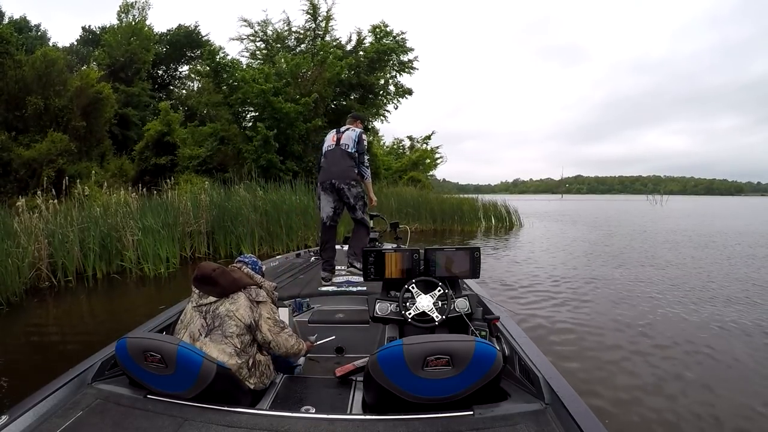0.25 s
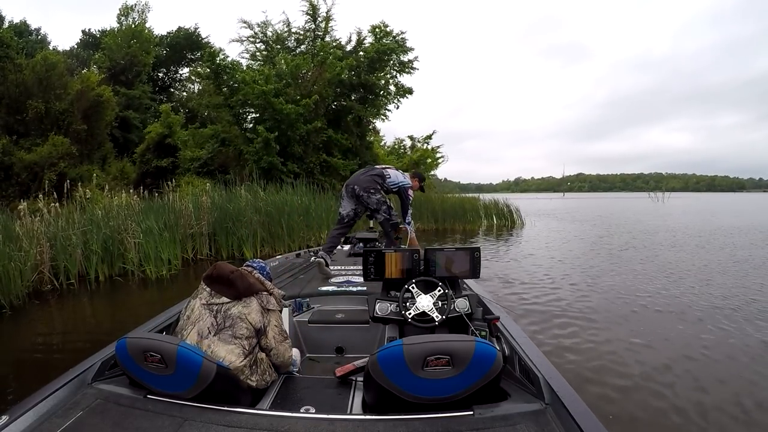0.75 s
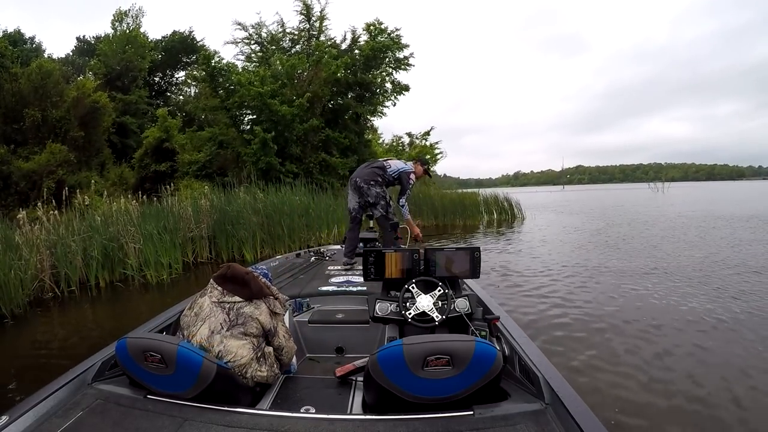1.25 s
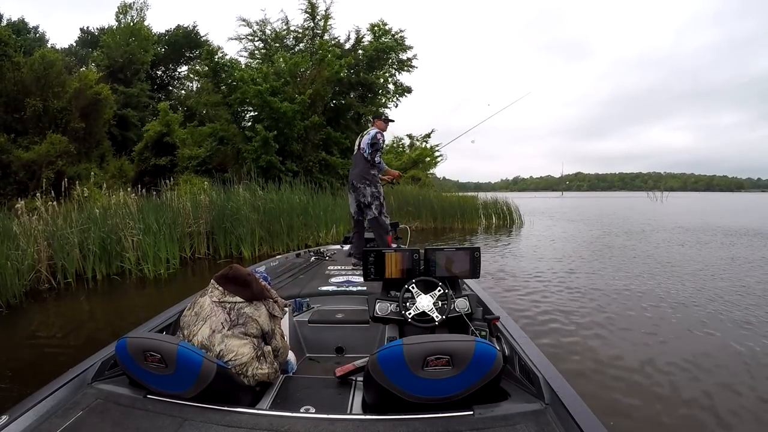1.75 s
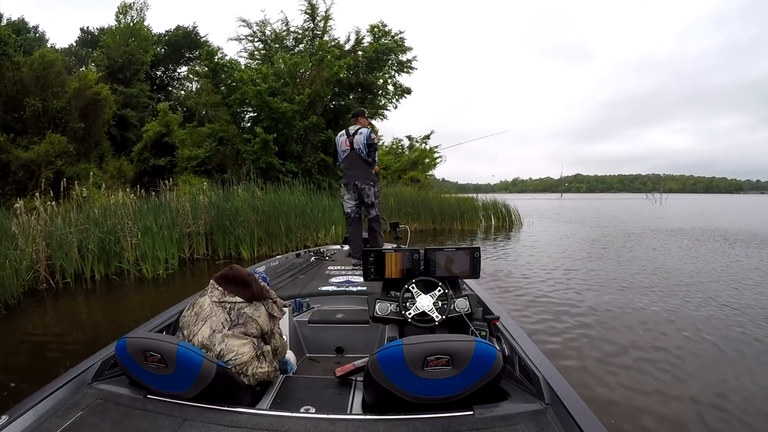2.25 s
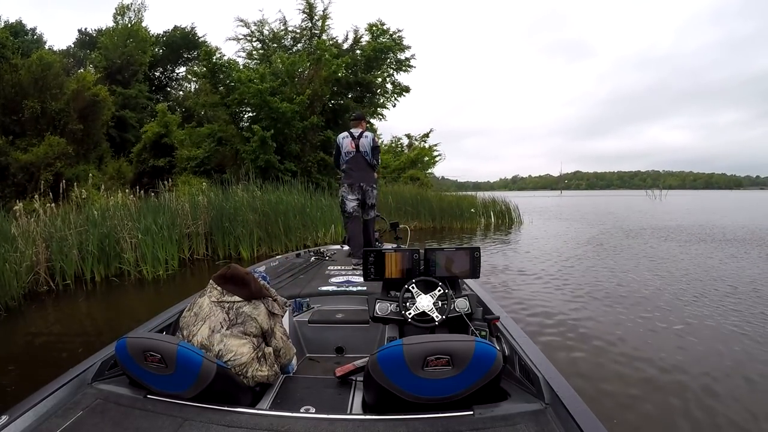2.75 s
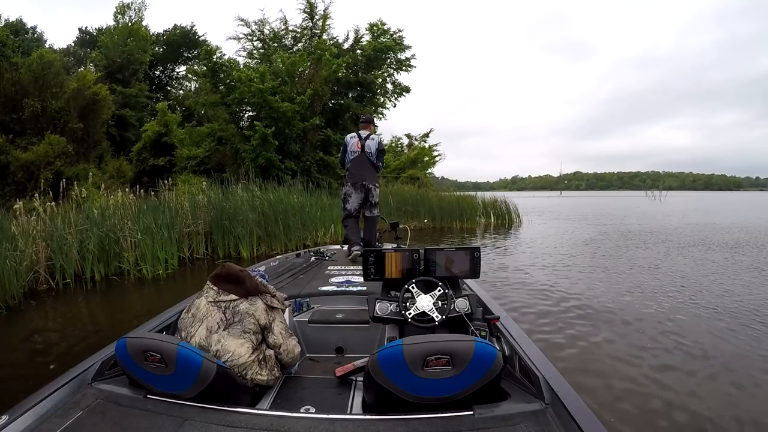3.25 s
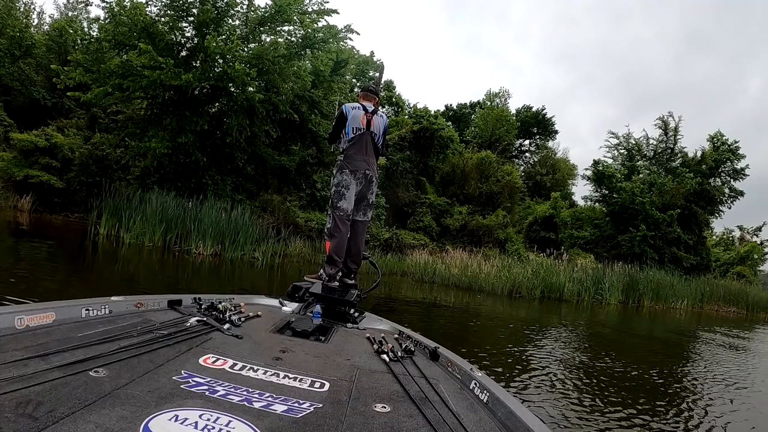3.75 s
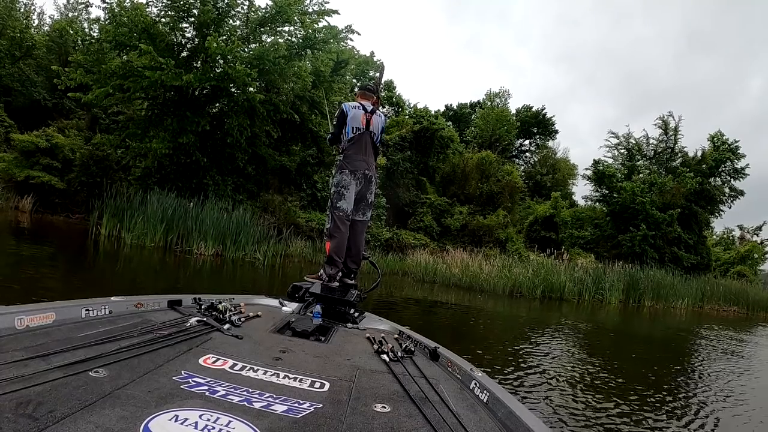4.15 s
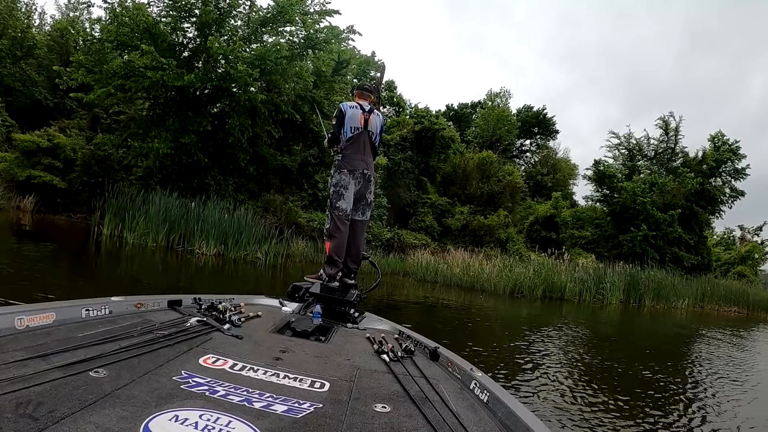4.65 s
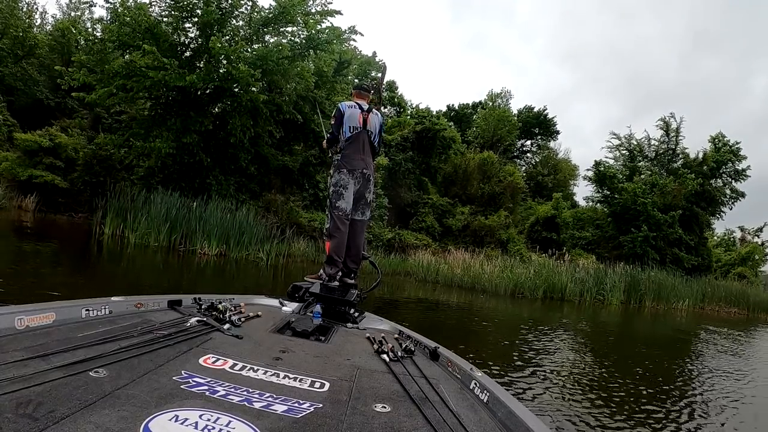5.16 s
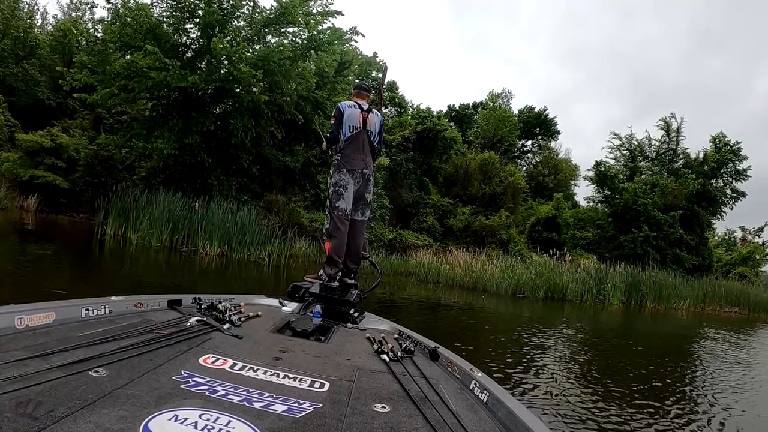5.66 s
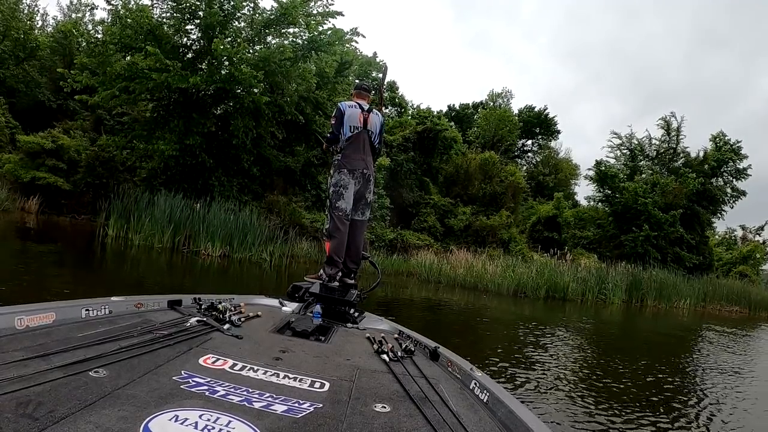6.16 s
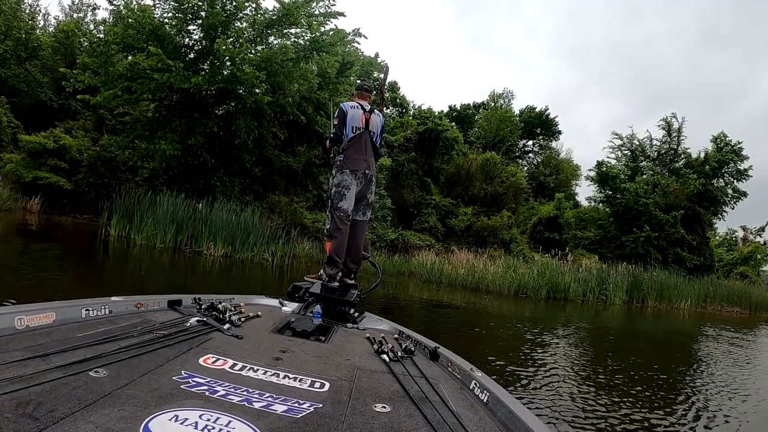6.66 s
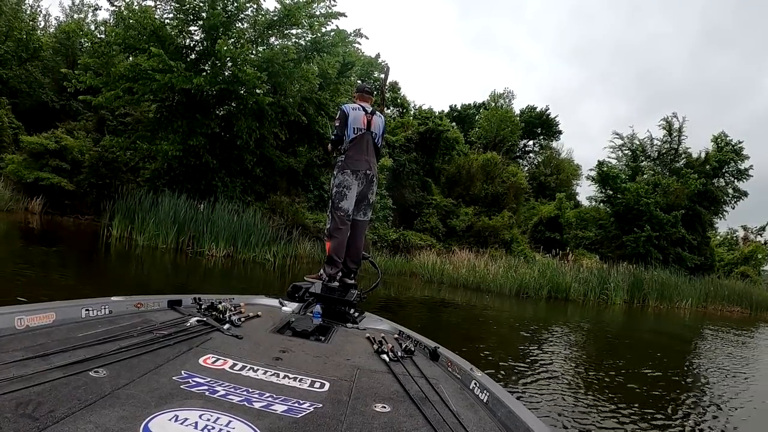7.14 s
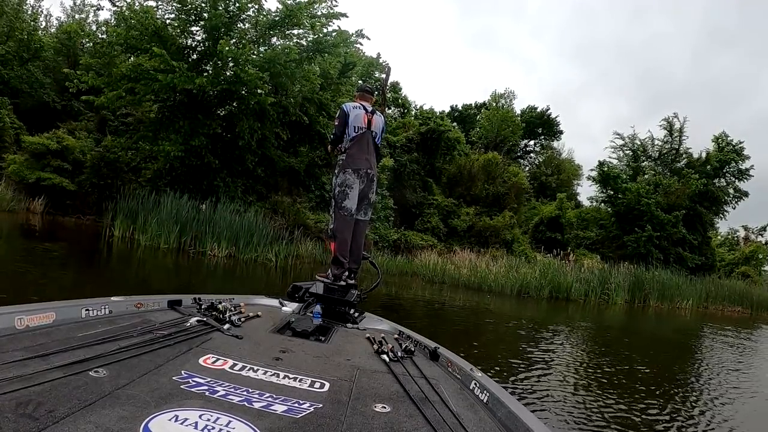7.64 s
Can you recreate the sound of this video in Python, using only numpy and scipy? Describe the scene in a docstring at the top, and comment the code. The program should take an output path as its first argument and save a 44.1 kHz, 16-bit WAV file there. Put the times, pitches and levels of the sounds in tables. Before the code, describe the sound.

Footsteps and gear knock on a boat deck amid wind rumble and lapping water, then a songbird whistles four times and a fishing reel clicks.

```python
"""Angler on a fishing boat

Stern, mono: steps and gear knock on a carpeted deck, the hull booms, tackle clinks, a rain suit
rustles, ripples lap, wind rumbles on the microphone. At 3.7 s the listening point jumps to the
quieter bow, stereo: a songbird whistles four times, the reel clicks, shore trees echo both."""
import sys
import numpy as np
from scipy import signal
from scipy.fft import rfft, irfft, next_fast_len
from scipy.io import wavfile
from scipy.ndimage import uniform_filter1d

SR = 44100
rng = np.random.default_rng(int(sys.argv[2]) if len(sys.argv) > 2 else 0)


def file_out(sig):
    """Save sig as 16-bit WAV at sys.argv[1]."""
    # one column per channel
    cols = np.atleast_2d(sig).T
    # limit, then scale
    lim = np.clip(cols, -1, 1)
    pcm = np.round(lim * 32767).astype(np.int16)
    wavfile.write(sys.argv[1], SR, pcm)


N = 348345
T = np.arange(N) / SR
JUMP_S = 3.708  # stern to bow
LEAD_S = .05  # carpet brush ahead of a blow

# heel strikes: t/s, contact/s, level/dB, panel note/Hz, ring/dB, tick/dB
HEEL_STRIKES = [(.142, 0.019, -47, 430, -7, -23), (.256, 0.021, -47.5, 490, -2, -2),
                (.49, 0.025, -48, 509, -2.5, -24), (1.078, 0.0039, -36, 493, -3, -14),
                (1.183, 0.0098, -32, 243, 1.5, -17.5), (1.261, 0.0088, -42, 516, -15, -19),
                (1.287, 0.016, -41.5, 321, 4, -13), (1.472, 0.02, -42, 283, 5.5, -7.5),
                (1.517, 0.023, -38, 264.4, 8, -11), (1.543, 0.0054, -44.5, 452, 10, -1),
                (1.648, 0.013, -27.5, 390, -0.5, -8.5), (1.841, 0.012, -36.5, 529, -0.5, -12),
                (1.864, 0.01, -39.5, 544, -4, -7), (1.927, 0.025, -43.5, 444, 1, -15),
                (2.06, 0.0088, -41.5, 326, -5, -10), (2.269, 0.015, -39, 710, -0.5, -12.5),
                (2.384, 0.031, -58.5, 306, 12, -19), (2.622, 0.017, -34.5, 316, 1.5, -16),
                (2.928, 0.0074, -28.5, 658, 4.5, -10.5), (3.033, 0.029, -44, 388, -4, -8),
                (3.105, 0.0058, -42, 1080, -19, -14), (3.138, 0.005, -51.5, 563, 2, -20),
                (3.168, 0.0059, -49, 323, 2, -28), (3.217, 0.0078, -44, 318, 4.5, -31),
                (3.273, 0.012, -37, 554, -7, -14), (3.324, 0.012, -42, 422, 0.5, -18),
                (3.679, 0.012, -42, 900, -4, -22)]
# rod and gear on deck: t/s, contact/s, level/dB, hardness/dB, part note/Hz, ring/dB
GEAR_KNOCKS = [(.401, 0.0049, -51, 6, 3900, -2), (.543, 0.01, -41.5, -2.5, 2040, -2.5),
               (.608, 0.0087, -43, 2.5, 1680, -8), (.916, 0.0064, -32.5, 3, 2170, -6.5),
               (1.036, 0.01, -58, 14.5, 5470, 1), (1.227, 0.0078, -42, 1, 3080, -12),
               (1.563, 0.014, -32, -2, 1415, -12), (1.622, 0.013, -34.5, 2, 1600, -3),
               (1.688, 0.011, -40, 3.5, 2280, -3), (1.739, 0.0062, -40.5, -2.5, 1320, -9),
               (1.782, 0.0087, -25.5, -1.5, 1035, -13), (1.796, 0.017, -28.5, -2, 1530, -10),
               (1.814, 0.0085, -30, -1, 1290, -10), (1.897, 0.0066, -32.5, -3, 1400, -9),
               (2.494, 0.021, -30, -2, 864, -2.5), (2.566, 0.017, -43.5, 4.5, 2620, -19),
               (2.602, 0.014, -35.5, 6.5, 1463, -2), (2.842, 0.013, -35, -6, 1397, -3.5),
               (2.899, 0.022, -37.5, -5, 1480, -9), (3.065, 0.01, -39.5, 1.5, 1530, -9),
               (3.191, 0.0037, -64, 13.5, 6300, 4), (3.42, 0.01, -44.5, 0, 2636, -6),
               (3.551, 0.013, -34, -2.5, 395, -3.5), (3.656, 0.014, -37, 0, 1490, -16),
               (3.702, 0.0029, -39.5, -1.5, 973, 2.5)]
# deck and hatch resonances: f/Hz, width/Hz, level/dB
DECK_MODES = [(249, 98, 6.5), (332, 100, -2), (389, 30, 1), (510, 104, 2), (658, 47, 5), (851, 92, -0.5),
              (1037, 117, 4.5), (1280, 140, 1.5), (1478, 88, 1), (1950, 93, -10), (3340, 90, -6.5),
              (3870, 45, -12)]
# dense small deck modes: f/Hz, level/dB
DECK_SPECTRUM = [(100, -8), (200, 0.5), (600, 0), (1500, -16), (2500, -5.5), (4500, -8), (7000, -16.5),
                 (9000, -20.5), (11500, -29.5), (15500, -37)]
# hull flexing under body weight: t/s, f/Hz, level/dB
HULL_THUMPS = [(.1, 97, -21.5), (0.175, 109, -18.5), (.545, 157.5, -24.5), (0.826, 62, -22),
               (1.185, 171, -26), (1.328, 66, -25), (1.518, 181, -26.5), (1.648, 100, -24.5),
               (1.792, 100, -31.5), (1.901, 232, -24), (2.189, 51, -26), (2.271, 276, -26.5),
               (2.497, 197, -28), (2.929, 253, -22.5), (3.117, 70, -20), (3.53, 58, -22.5),
               (3.643, 57.3, -23)]
# metal tackle: t/s, f/Hz, level/dB, t60/s
TACKLE_CLINKS = [(1.473, 5060, -31, 0.086), (1.474, 11900, -51, .05), (1.507, 5100, -36, 0.056),
                 (2.499, 5030, -33.5, 0.11), (2.513, 3410, -34, 0.16), (2.558, 2115, -30.5, 0.075),
                 (2.566, 5060, -35, 0.23), (2.566, 7930, -48, 0.29), (2.606, 4590, -37, 0.14),
                 (2.629, 4590, -26.5, 0.078), (2.606, 8440, -39.5, 0.13)]
# briskness of suit and feet: t/s, level/dB
RUSTLE_LEVEL = [(0.0, -40), (.2, -43.5), (0.33, -48.5), (0.8, -45), (1.29, -59), (1.53, -52), (1.67, -41.5),
                (1.74, -48), (2.08, -52.5), (2.27, -62), (2.66, -48), (3.0, -64.5), (3.33, -49),
                (3.48, -61.5), (3.7, -43)]
# suit crackle: f/Hz, level/dB
RUSTLE_SPECTRUM = [(100, 0.5), (250, 10), (500, -2), (900, -3), (2500, -5.5), (4500, -10), (7000, -17.5),
                   (9500, -24), (12500, -37), (15500, -70)]
# cloth strokes: t/s, length/s, level/dB
SWISH_STROKES = [(.87, .06, -38), (1.305, .025, -56), (1.99, .045, -51), (2.915, .055, -45),
                 (3.25, .09, -54), (3.385, .055, -57), (3.585, .07, -53)]
# cloth on cloth: f/Hz, level/dB
SWISH_SPECTRUM = [(500, -14), (1500, 0), (4000, 0), (6500, -2), (9500, -11), (15500, -30)]
# songbird phrases: whistle onset t/s, level/dB
PHRASES = [(3.749, -43.5), (4.127, -43), (4.51, -44), (4.892, -43)]
# opening upsweep: t/s from whistle onset, f/Hz, level/dB, overtones/dB
UPSWEEP_NOTE = [(-.099, 1760, -17, 0), (-.09, 2030, -16, -7), (-.079, 2190, -7, -2), (-.072, 2680, -6, -21)]
# buzzy chip: t/s from whistle onset, f/Hz, level/dB, overtones/dB
CHIP_NOTE = [(-.071, 3094, -1, -24), (-.054, 2870, -6, -12), (-.025, 2877, -11.5, -21)]
# falling whistle: t/s from its onset, f/Hz, level/dB, overtones/dB
WHISTLE_NOTE = [(-.002, 2330, -5, -45), (.004, 1975, -2.5, -53), (.03, 1815, -0.5, -34),
                (.06, 1670, -8, -36), (.115, 1417, -26, -40)]
# soft closing slur: t/s from whistle onset, f/Hz, level/dB, overtones/dB
SLUR_NOTE = [(.16, 2615, -27, -42), (.195, 2220, -20.5, -38), (.225, 1920, -24, -43)]
# reel catch: t/s, contact/s, level/dB, frame ring/dB, treble/dB
REEL_SNAPS = [(4.029, 0.0036, -39.5, -19, -16), (4.038, 0.0017, -39, -12, -9),
              (4.0418, 0.00027, -25.5, -18, -3), (6.1626, 0.00083, -34.5, -43, 0.5),
              (6.723, 0.0056, -39.5, -9.5, -29), (6.7338, 0.0025, -33.5, -4, 0.5)]
# reel frame resonances: f/Hz, width/Hz, level/dB
REEL_MODES = [(1090, 130, -4), (2285, 68, 15), (3900, 220, 6), (4400, 300, -1), (6600, 350, -13),
              (9000, 400, -19)]
# snap of the catch: f/Hz, level/dB
SNAP_SPECTRUM = [(500, -31), (1300, 6), (4800, -1), (9000, -0.5), (12000, -15), (15500, -33)]
# line winding on: t/s, level/dB
WINDING_LEVEL = [(7.54, -100), (7.58, -68.5), (7.9, -80)]
# wind strength at the stern: t/s, level/dB
STERN_WIND_LEVEL = [(0, -29.5), (.16, -27), (.24, -34.5), (.64, -33), (.84, -32), (.89, -39.5),
                    (1.2, -38.5), (1.85, -45.5), (2.55, -38), (3.7, -40)]
# wind rumble: f/Hz, level/dB
WIND_SPECTRUM = [(12, -13), (29, 4.5), (50, -3.5), (78, -0.5), (100, -5), (170, -7), (240, -17),
                 (330, -35.5), (600, -59.5), (4000, -100)]
# distant calls, and chip echoes at 4.68 and 5.073 s: t/s, length/s, start f/Hz, end f/Hz, level/dB
FAR_CALLS_AND_ECHOES = [(3.812, 0.086, 7850, 7700, -72), (4.68, 0.12, 4100, 4420, -71),
                        (4.969, 0.055, 5920, 5170, -69), (5.073, 0.16, 4330, 4010, -71.5),
                        (5.208, 0.044, 2825, 2660, -62), (5.349, .11, 2400, 2850, -65)]
# open air over the lake: f/Hz, level/dB
AIR_SPECTRUM = [(150, -9.5), (250, -12), (330, -8), (580, -15.5), (780, -10.5), (900, -12.5), (1300, -12.5),
                (1900, -20.5), (3000, -26.5), (4000, -32.5), (7000, -39.5), (10000, -51.5), (15500, -73)]


def steps(thud_db=3.5):
    """Soft heels sound the hollow note of the panel underfoot."""
    out = np.zeros(N)
    for s, length_s, db, hz, ring_db, tick_db in HEEL_STRIKES:
        step = blow(length_s, thud_db, tick_db, hz, ring_db, t60_s=0.059, top_hz=11400)
        add(out, s - LEAD_S - .002, undb(db) * step)
    return out


def gear(thud_db=-4, tick_db=-5, bounce_s=0.036, bounce_db=-26):
    """Parts land, ring and bounce once; harder ones tick more and thud less."""
    out = np.zeros(N)
    for s, length_s, db, hard_db, hz, ring_db in GEAR_KNOCKS:
        bounce = bounce_s * rng.uniform(0.77, 1.15), db + bounce_db
        for lag_s, touch_db in (0, db), bounce:
            knock = blow(length_s, thud_db - hard_db, tick_db + hard_db, hz, ring_db,
                         t60_s=0.05, top_hz=14400)
            add(out, s + lag_s - LEAD_S - .002, undb(touch_db) * knock)
    return out


def blow(length_s, thud_db, tick_db, hz, ring_db, t60_s, top_hz, grit_db=1):
    """One deck impact; thud, tick and the struck part's note are set relative to its clack."""
    softness = length_s / 0.013
    rise_s = 0.0044 * np.sqrt(softness)
    push = contact(length_s, rise_s, grit_db, fall=1.86)
    t = T[:len(push)]
    hollow = decay(t, 2.2 * rise_s, t60_s) * np.sin(2 * np.pi * hz * t + 0.53 * walk(220, len(t)))
    # slow blows brush the carpet first
    ahead_s = np.arange(int(LEAD_S * SR), 0, -1) / SR
    brush = softness * np.maximum(1 - ahead_s / length_s, 0) * rng.standard_normal(len(ahead_s))
    push = np.concatenate([undb(-16) * brush, push])
    carpeted = band(ring(push, struck_spot()), 7000, "low")
    deck = carpeted + band(colour(push, DECK_SPECTRUM), top_hz, "low")
    thud, clack, tick = band(deck, 800, "low"), band(deck, [800, 2500], "band"), band(deck, 2500, "high")
    parts = (thud, thud_db), (clack, 0), (tick, tick_db), (np.pad(hollow, (len(ahead_s), 0)), ring_db)
    return sum(undb(db) * unit_over(part, 1.645 * length_s + 0.0045) for part, db in parts)


def contact(length_s, rise_s, grit_db, fall):
    """A crowd of tiny impacts: fast build-up, power-law decay."""
    t = T[:SR // 4]
    swell = np.minimum(t / rise_s, 1) ** 2 / (1 + (t / length_s) ** fall) * (1 - t / t[-1])
    return swell * rng.standard_normal(len(t)) * undb(grit_db * walk(900, len(t)))


def struck_spot():
    """Each spot reweights and slightly detunes the deck modes."""
    chance = rng.standard_normal((len(DECK_MODES), 2))
    return [(hz * (1 + .02 * shift), width_hz, db + 3.5 * favour)
            for (hz, width_hz, db), (shift, favour) in zip(DECK_MODES, chance)]


def hull(rise_s=0.004, t60_s=0.11):
    """The hull gives under a step and swings a few times."""
    out, t = np.zeros(N), T[:SR // 4]
    for s, hz, db in HULL_THUMPS:
        add(out, s, undb(db) * decay(t, rise_s, t60_s) * np.sin(2 * np.pi * hz * t))
    return out


def tackle(rise_s=0.0037, rattle_db=1.0, waver_rad=0.26):
    """Small metal parts ring with clear, trembling notes."""
    out, t = np.zeros(N), T[:SR // 4]
    for s, hz, db, t60_s in TACKLE_CLINKS:
        rattle = undb(rattle_db * walk(290, len(t)))
        tone = np.sin(2 * np.pi * hz * t + waver_rad * walk(300, len(t)))
        add(out, s, undb(db) * decay(t, rise_s, t60_s) * rattle * tone)
    return out


def fidgets(count=48, db=-53, spread_db=2, follow=0.38):
    """Soles and loose things tap lightly, louder during brisk movement."""
    out = np.zeros(N)
    times_s, brisk_db = np.transpose(RUSTLE_LEVEL)
    for k, (when, size, hard) in enumerate(rng.uniform(-0.92, 1, (count, 3))):
        s = (k + .5 + when / 2) * JUMP_S / count
        tap = blow(length_s=0.0046, thud_db=1 - 4 * hard, tick_db=-11 + 4 * hard, hz=550 * 2 ** hard,
                   ring_db=-7, t60_s=0.05, top_hz=8000, grit_db=2.5)
        motion_db = follow * (np.interp(s, times_s, brisk_db) - brisk_db.mean())
        add(out, s - LEAD_S, undb(db + spread_db * size + motion_db) * tap)
    return out


def rustle(scuff_db=-7):
    """Stiff cloth crackles; soles scuff the carpet and stir the deck modes at random."""
    crackle = rng.standard_normal(N) * undb(1.1 * walk(1500) + 1.0 * walk(34.75))
    cloth = colour(crackle, RUSTLE_SPECTRUM)
    stirred = sum(ring(rng.standard_normal(N) * undb(7.0 * walk(40)), [mode]) for mode in DECK_MODES)
    scuff = band(stirred, 1560, "low")
    return curve(RUSTLE_LEVEL) * (unit(cloth) + undb(scuff_db) * unit(scuff))


def songbird():
    """Four phrases of upsweep, chip, whistle and slur."""
    out = np.zeros(N)
    notes = (UPSWEEP_NOTE, 0.021), (CHIP_NOTE, 0.02), (WHISTLE_NOTE, 0.007), (SLUR_NOTE, 0.01)
    for s, db in PHRASES:
        for rows, waver in notes:
            add(out, s + rows[0][0], undb(db) * bird_note(rows, waver))
    return out


def bird_note(rows, waver, rasp_rad=0.37):
    """A gliding tone with three raspy overtones."""
    s, *columns = np.transpose(rows)
    t = np.arange(s[0], s[-1], 1 / SR)
    hz, db, overtone_db = (np.interp(t, s, c) for c in columns)
    phase = 2 * np.pi * np.cumsum(hz * (1 + waver * walk(322, len(t)))) / SR
    overtones = sum(undb(k_db) * np.sin(k * phase + rasp_rad * (k - 1) * walk(1200, len(t)))
                    for k, k_db in ((2, 0), (3, -3), (4, -11)))
    return (np.sin(phase) + undb(overtone_db) * overtones) * undb(db) * signal.windows.tukey(len(t), .1)


def reel(frame_db=0):
    """The catch snaps; the frame rings briefly."""
    out = np.zeros(N)
    for s, length_s, db, ring_db, treble_db in REEL_SNAPS:
        push = contact(length_s, rise_s=0.0025, grit_db=-1.0, fall=1.96)
        snap = colour(colour(push, SNAP_SPECTRUM), [(1500, 0), (6000, treble_db)])
        frame = undb(ring_db + frame_db) * unit_over(ring(push, REEL_MODES), 8.3 * length_s)
        add(out, s, undb(db) * (unit_over(snap, 1.4 * length_s) + frame))
    return out


def shore_echo(directions=3):
    """The reel sends a different snap each way; the tree line returns them all."""
    spectrum = [(1000, -31), (2300, -13.5), (3800, -10.5), (6200, -9.0), (9500, -20.5), (14000, -11)]
    return sum(echo(reel(frame_db=-11), delay_s=0.04, t60_s=0.43, spectrum=spectrum)
               for _ in range(directions))


def winding():
    """Line hisses faintly through the guides."""
    friction = rng.standard_normal(N) * undb(1.1 * walk(66))
    hiss = colour(friction, [(1000, -22), (2500, 6.5), (6000, -1), (9000, -5.5), (13000, -32)])
    return curve(WINDING_LEVEL) * unit(hiss)


def wind(gust_db=2, gusts_per_s=6.98, bow_db=-47, side_db=-21, left_db=0.4, split_hz=90):
    """Eddies buffet the microphone: gusty at the stern; even at the bow, where its two ports differ."""
    eddies, side = (colour(rng.standard_normal(N), WIND_SPECTRUM) for _ in range(2))
    parts = band(eddies, split_hz, "low"), band(eddies, split_hz, "high")
    steady = unit(sum(p * p.std() / np.sqrt(uniform_filter1d(p ** 2, SR // 6)) for p in parts))
    ports = np.array([[1], [-1]])
    stern = undb(gust_db * walk(gusts_per_s)) * curve(STERN_WIND_LEVEL) * unit(eddies)
    bow = undb(bow_db + ports * left_db / 2) * (steady + undb(side_db) * unit(side) * ports)
    return np.where(T < JUMP_S, stern, bow)


def lapping(count=44, db=-44, spread_db=6, low_hz=270, high_hz=1100, cycles=20):
    """Ripples cluck against the hull: short, slightly rising notes."""
    out, t = np.zeros(N), T[:SR // 8]
    for when, pitch, size in rng.random((count, 3)):
        hz = low_hz * (high_hz / low_hz) ** pitch
        age = t * hz / cycles
        envelope = np.minimum(age / 0.14, 1) * np.exp(-np.log(100) * age)
        cluck = envelope * np.sin(2 * np.pi * hz * t * (1 + 0.039 * age))
        add(out, when * JUMP_S, undb(db + spread_db * size - 6 * pitch) * cluck)
    return out


def far_calls_and_echoes(blur_hz=130):
    """Faint distant bird calls, and the songbird's chip echoing back from the wood; blurred glides."""
    out = np.zeros(N)
    for s, length_s, start_hz, end_hz, db in FAR_CALLS_AND_ECHOES:
        glide = bird_note([(0, start_hz, db, -40), (length_s, end_hz, db, -40)], blur_hz / start_hz)
        add(out, s, glide * signal.windows.tukey(len(glide), .5))
    return out


def air(db=-61, left_db=4.5, side_db=-3):
    """Wash of leaves and ripples, stronger from the shore on the left."""
    mid, side = (unit(colour(rng.standard_normal(N), AIR_SPECTRUM)) for _ in range(2))
    ports = np.array([[1], [-1]])
    wash = mid + undb(side_db) * band(side, 580, "high") * ports
    return undb(db + .5 * walk(11)) * wash * undb(ports * left_db / 2)


def echo(x, delay_s, t60_s, spectrum):
    """Diffuse reflection, scattered differently left and right."""
    t = T[:SR]
    onset = np.clip((t - delay_s) / 0.0033, 0, 1)
    scatter = rng.standard_normal((2, SR)) * onset * np.exp(-np.log(1000) * t / t60_s)
    responses = (colour(ear / np.linalg.norm(ear), spectrum) for ear in scatter)
    return np.array([signal.fftconvolve(x, response)[:N] for response in responses])


def undb(db):
    """dB to gain."""
    return 10 ** (np.asarray(db) / 20)


def unit(x):
    """Scale to rms 1."""
    return x / np.sqrt(np.mean(x ** 2))


def unit_over(x, length_s):
    """Scale to the energy of rms 1 held for length_s."""
    return x / np.sqrt(np.sum(x ** 2) / (length_s * SR))


def curve(rows):
    """Gain over time from (t/s, level/dB) rows."""
    return undb(np.interp(T, *np.transpose(rows)))


def decay(t, rise_s, t60_s):
    """Linear rise, exponential fall."""
    return np.minimum(t / rise_s, 1) * np.exp(-np.log(1000) * t / t60_s)


def walk(rate_hz, size=N):
    """Smooth random drift."""
    k = max(int(SR / rate_hz), 1)
    return 1.84 * uniform_filter1d(np.repeat(rng.standard_normal(size // k + 1), k), k)[:size]


def add(track, s, sound):
    """Mix in at s seconds."""
    i = max(int(s * SR), 0)
    track[i:i + len(sound)] += sound[:N - i]


def colour(x, spectrum):
    """Minimum-phase filter through (f/Hz, level/dB) points."""
    hz, db = np.transpose(spectrum)
    n = next_fast_len(len(x), True)
    f = np.fft.rfftfreq(2 * n, 1 / SR)
    cepstrum = irfft(np.log(undb(np.interp(np.log(f + 1), np.log(hz), db))))
    cepstrum[1:n] *= 2
    cepstrum[n:] = 0
    return irfft(rfft(x, 2 * n) * np.exp(rfft(cepstrum)))[:len(x)]


def ring(x, modes):
    """Drive (f/Hz, width/Hz, level/dB) resonances."""
    return sum(undb(db) * signal.lfilter(*signal.iirpeak(hz, hz / width_hz, fs=SR), x)
               for hz, width_hz, db in modes)


def band(x, hz, kind):
    """Third-order Butterworth."""
    return signal.sosfilt(signal.butter(3, hz, kind, fs=SR, output="sos"), x)


def delay(x, lag_s):
    """Sub-sample delay."""
    n = 2 * next_fast_len(N, True)
    return irfft(rfft(x, n) * np.exp(-2j * np.pi * np.fft.rfftfreq(n, 1 / SR) * lag_s))[:N]


def scene():
    """Mono stern, then stereo bow; wind throughout."""
    stern = steps() + gear() + fidgets() + hull() + tackle() + rustle() + lapping()
    clicks, song, far = reel(), songbird(), far_calls_and_echoes()
    # leaves take treble from the direct path and scatter it
    direct = colour(song, [(2000, 3.5), (3000, 2.5), (4500, 2.5), (7500, -12.5)]) + undb(-2.5) * far
    foliage = echo(song, delay_s=0.0016, t60_s=0.36,
                   spectrum=[(1900, -7.5), (2900, -2.5), (4400, 7.5), (6500, -17)])
    wood = echo(song, delay_s=0.056, t60_s=0.86,
                spectrum=[(1900, -12), (2900, -4), (4300, -1.0), (6000, -10.5)])
    deep_wood = echo(far, delay_s=0.0025, t60_s=0.5, spectrum=[(2000, -0.5), (8000, -4.5)])
    near_deck = echo(clicks, delay_s=0.0051, t60_s=0.064, spectrum=[(1000, -6.5), (10000, -17.5)])
    snaps = np.array([delay(clicks, lag_s=2e-5), clicks])  # right port first
    bow = snaps + shore_echo() + near_deck + direct + foliage + wood + deep_wood + winding() + air()
    return np.where(T < JUMP_S, stern, bow) + wind()


def record(dry):
    """Steep low-pass at 15.8 kHz."""
    return signal.sosfilt(signal.ellip(8, .2, 70, 15800, fs=SR, output="sos"), dry)


dry = scene()
out = record(dry)
file_out(out)
```